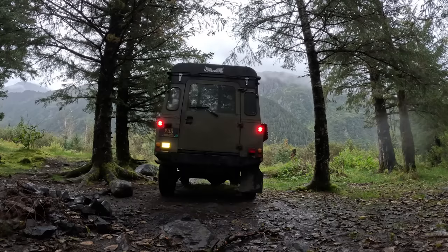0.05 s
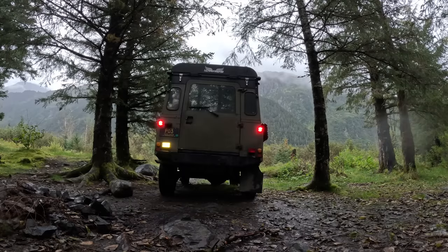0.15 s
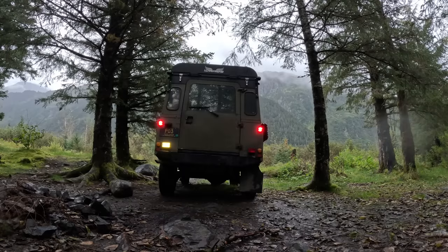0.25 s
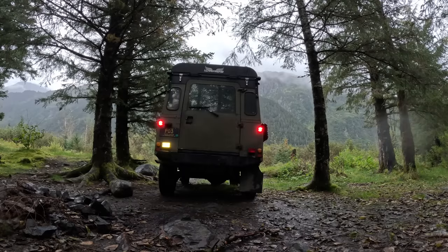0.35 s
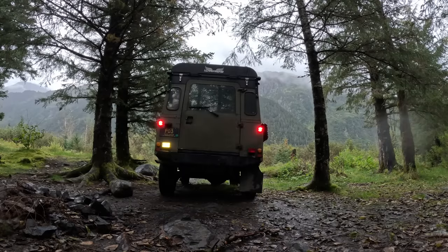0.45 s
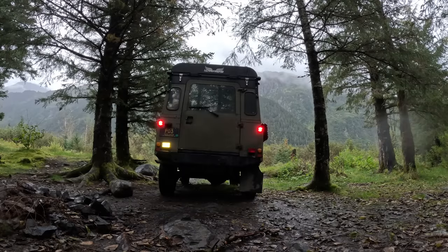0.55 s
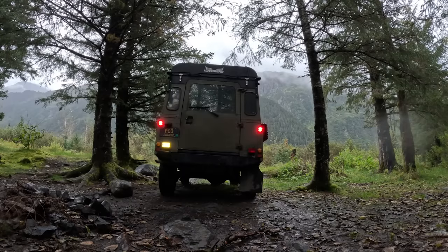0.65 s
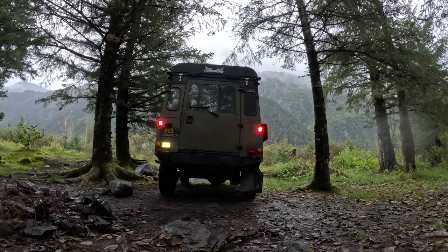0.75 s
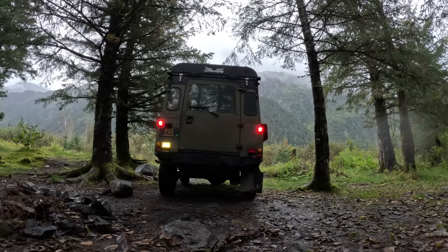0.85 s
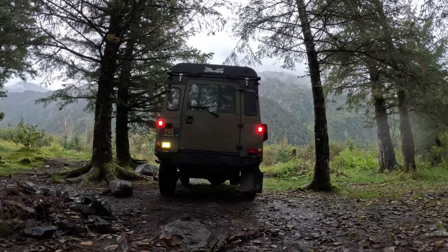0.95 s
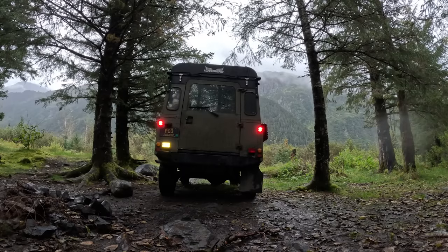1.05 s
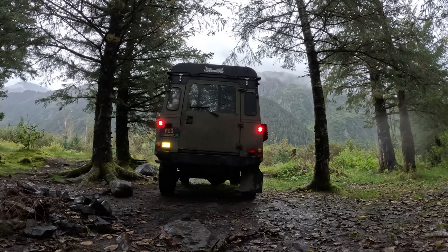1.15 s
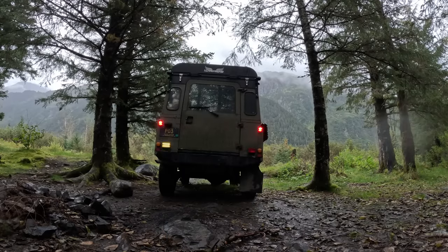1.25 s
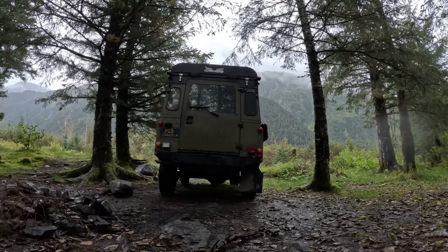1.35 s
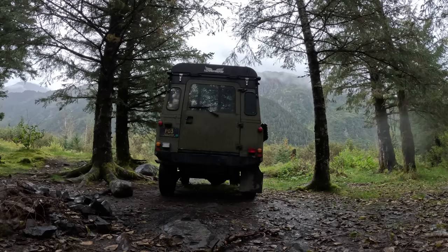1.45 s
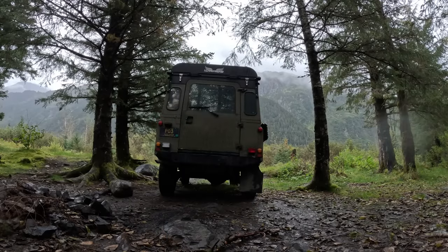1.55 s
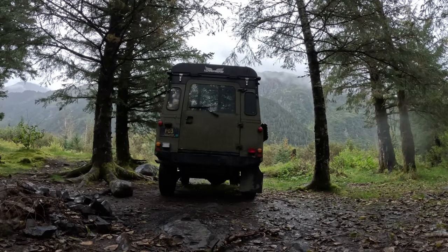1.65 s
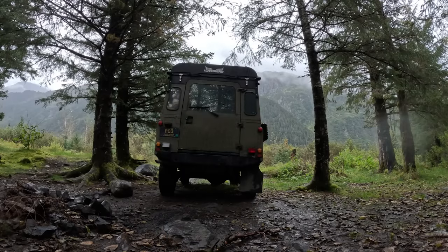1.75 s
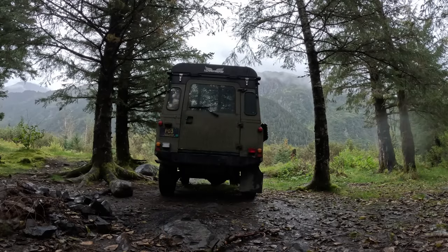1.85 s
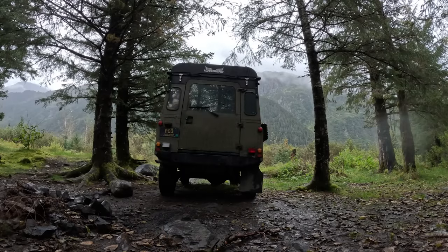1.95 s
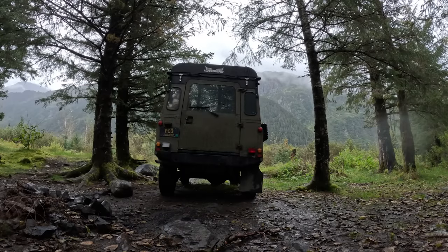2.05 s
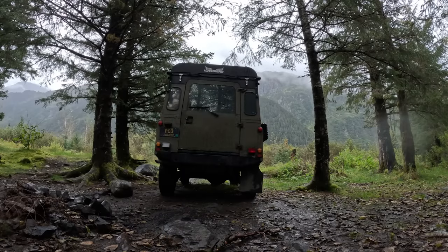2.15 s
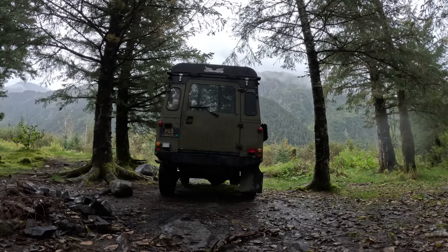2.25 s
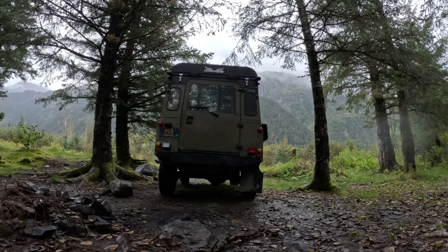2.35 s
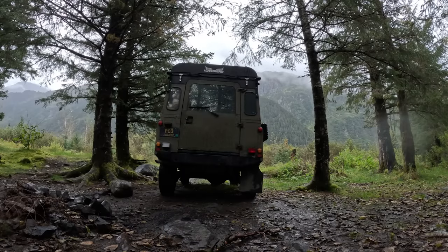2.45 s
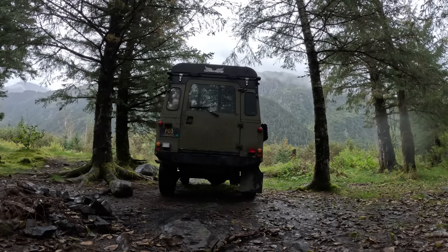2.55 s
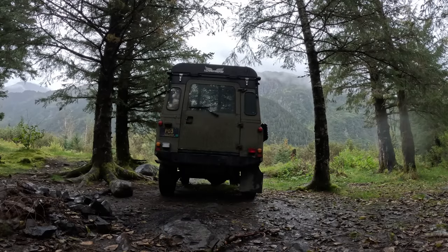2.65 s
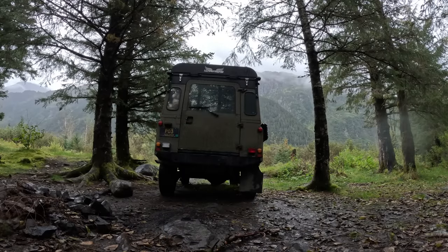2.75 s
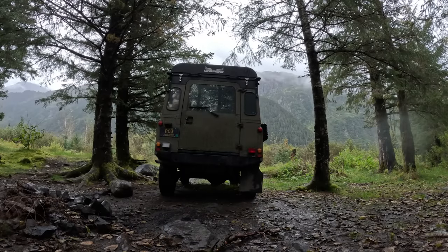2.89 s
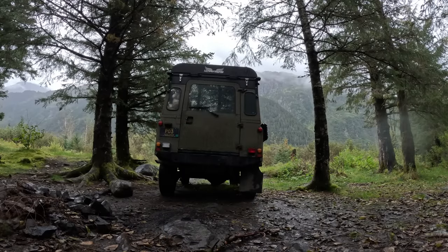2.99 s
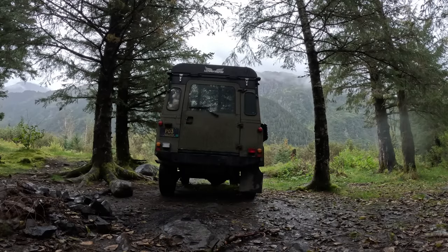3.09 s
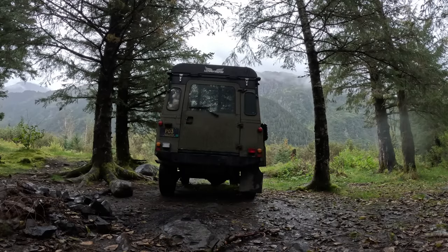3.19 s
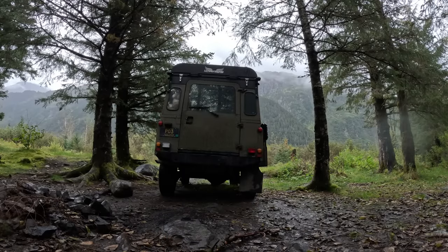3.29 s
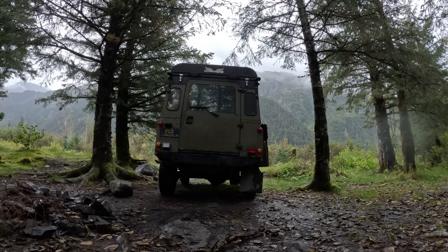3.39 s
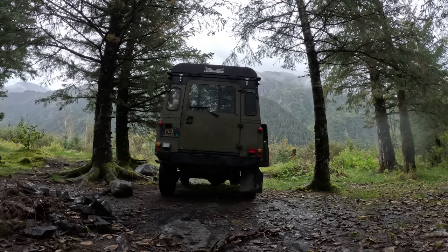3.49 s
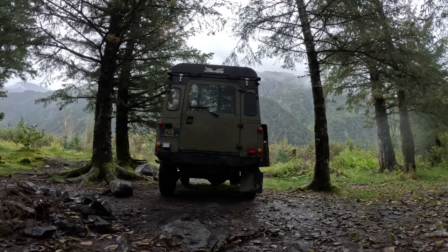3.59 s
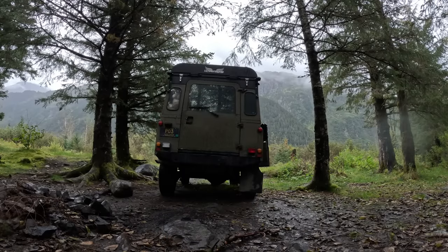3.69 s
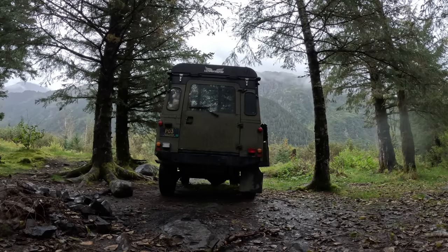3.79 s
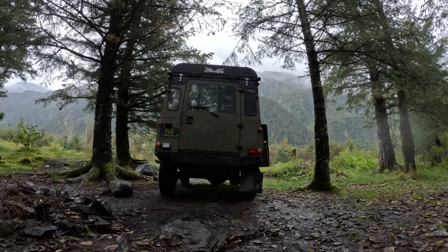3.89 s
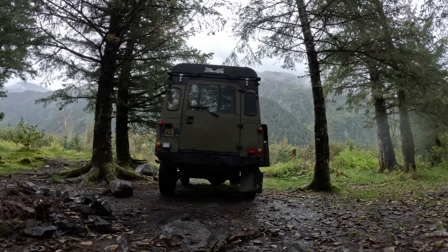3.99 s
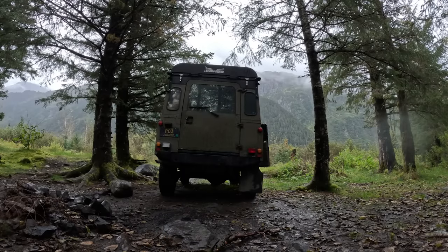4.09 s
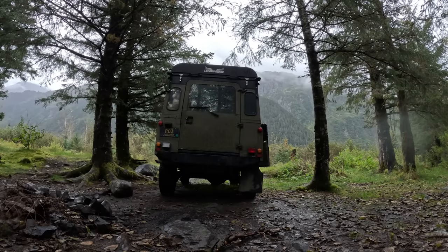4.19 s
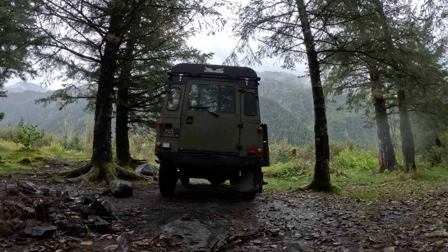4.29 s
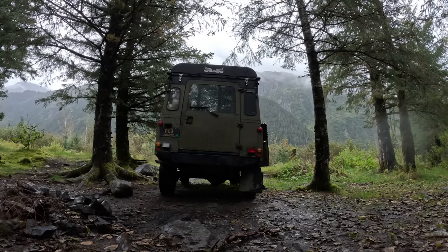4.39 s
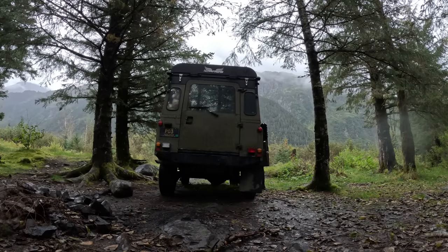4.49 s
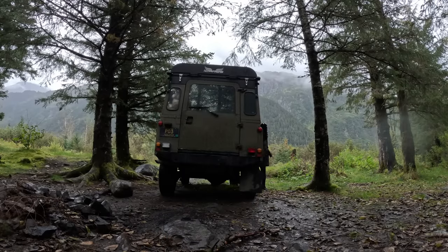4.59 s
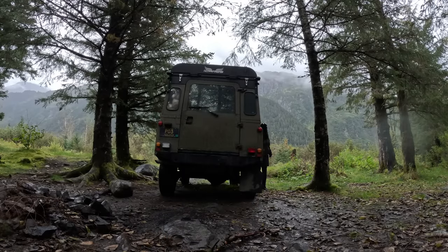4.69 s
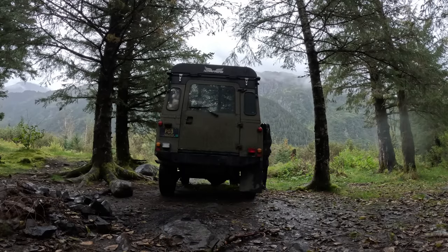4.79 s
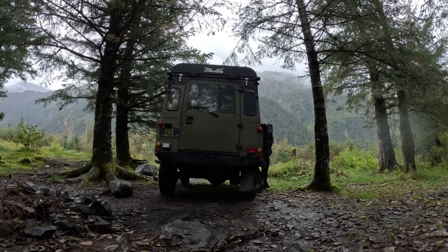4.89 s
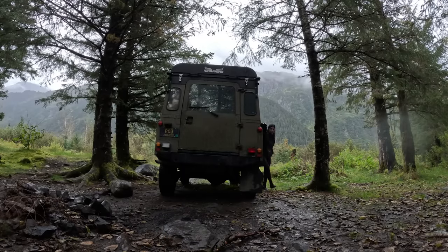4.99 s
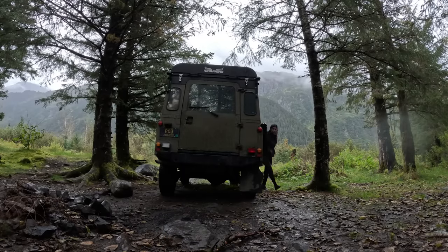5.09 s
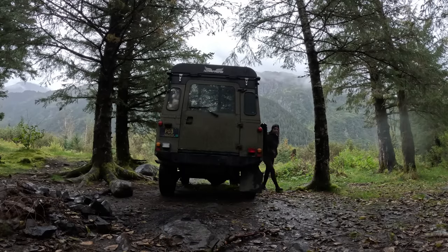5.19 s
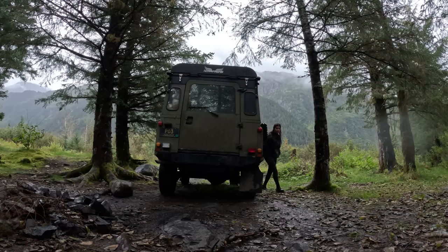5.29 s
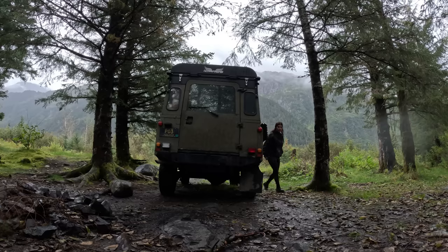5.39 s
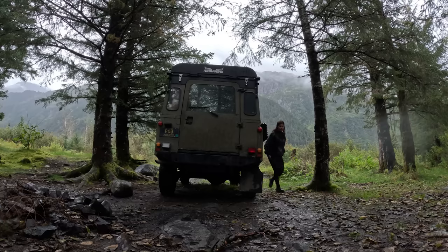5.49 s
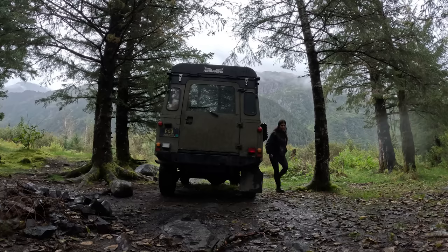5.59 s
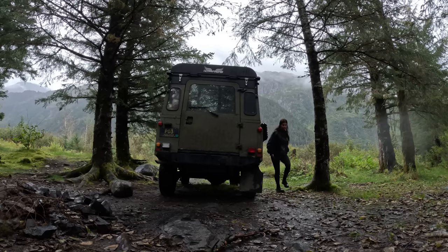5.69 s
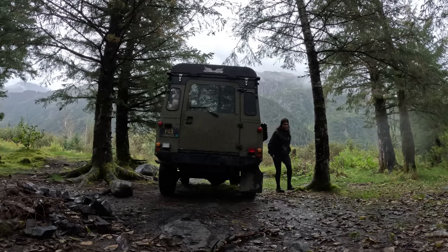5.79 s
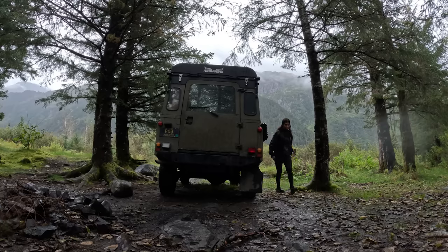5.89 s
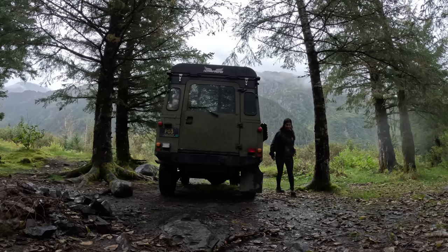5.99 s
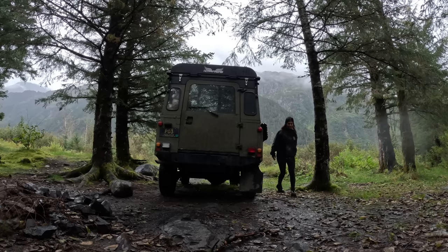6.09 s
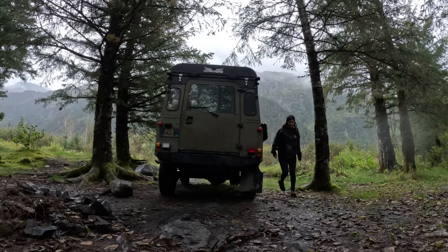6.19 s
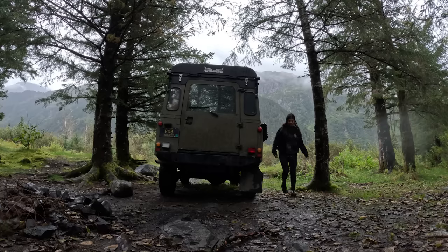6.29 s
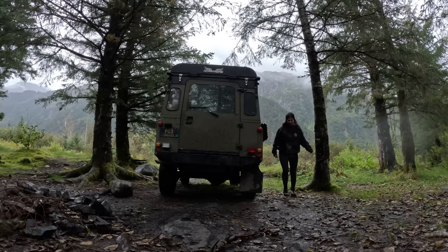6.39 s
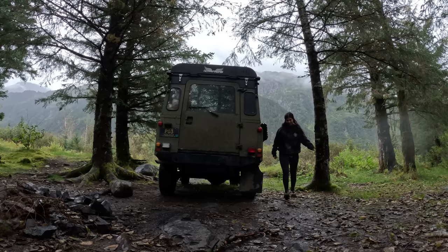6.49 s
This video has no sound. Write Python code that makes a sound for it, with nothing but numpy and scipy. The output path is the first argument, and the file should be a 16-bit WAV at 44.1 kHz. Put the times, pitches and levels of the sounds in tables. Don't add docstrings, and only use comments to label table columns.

```python
import sys
import numpy as np
from scipy import signal
from scipy.fft import rfft, irfft, next_fast_len
from scipy.io import wavfile

SR = 44100
rng = np.random.default_rng(int(sys.argv[2]) if len(sys.argv) > 2 else 0)


def level_to_linear(level):
    exponent = np.asarray(level, float) / 20
    return 10 ** exponent


def output_pcm(signal):
    pcm = np.clip(np.atleast_2d(signal).T, -1, 1) * 32767
    wavfile.write(sys.argv[1], SR, np.round(pcm).astype(np.int16))


N = 288742
TINY = 1e-18


def at_hz(points, hz):
    table_hz, value = np.array(points)[:, :2].T
    return np.interp(np.log(hz), np.log(table_hz), value)


def clicks(times_s, db):
    out = np.full(N, TINY)
    at = np.round(np.asarray(times_s) * SR).astype(int)
    np.add.at(out, at, level_to_linear(db))
    return out


def ring(x, hz, t60_s):
    radius = level_to_linear(-60 / (t60_s * SR))
    angle = 2 * np.pi * hz / SR
    return signal.lfilter([0, np.sin(angle)], [1, -2 * radius * np.cos(angle), radius ** 2], x)


def ring_modes(x, modes):
    return sum(level_to_linear(db) * ring(x, hz, t60_s) for hz, db, t60_s in modes)


def butter(x, order, hz, kind):
    return signal.sosfilt(signal.butter(order, hz, kind, fs=SR, output="sos"), x)


def lowpass(x, hz):
    return butter(x, 2, hz, "low")


def pan(x, left_right_db):
    return x * level_to_linear([[left_right_db / 2], [-left_right_db / 2]])


def swell(length, rise_s, t60_s):
    t = np.arange(length) / SR
    return (1 - np.exp(-t / rise_s)) * level_to_linear(-60 * t / t60_s)


def humps(rows):
    s, db, fall_db_per_s = np.transpose(rows)[:, :, None]
    return np.max(db - fall_db_per_s * np.abs(np.arange(N) / SR - s), axis=0)


# time in seconds, level in dB.
SHOWER = [
    (2.5, -56),
    (2.58, -56.5),
    (5.24, -53.5),
    (5.58, -55.5),
    (5.74, -58),
    (5.99, -57.5),
    (6.22, -55.5),
    (6.55, -56.5),
]


def shower():
    s, db = np.transpose(SHOWER)
    return level_to_linear(np.interp(np.arange(N) / SR, s, db - db.mean()))


# frequency in Hz, likeness 0 to 1.
RAIN_ALIKE = [(60, 0.95), (150, 1), (380, 0.78), (950, 0.68), (2380, 0.54), (5980, 0.69), (15000, 0.3)]
# frequency in Hz, level in dB per Hz.
RAIN = [(30, -7), (95, -7.5), (181, -1), (373, -8), (458, -14.5), (592, -13), (871, -21.5), (1020, -13),
        (1310, -11.5), (6310, -21), (9200, -28), (10300, -42), (12000, -39.5), (13600, -48)]
RAIN_DB, RAIN_DROPS_PER_S = -52.5, 1500


def rain():
    size = next_fast_len(N)
    hz = np.maximum(np.fft.rfftfreq(size, 1 / SR), 1)
    drop_level = level_to_linear(5.0 * np.minimum(rng.exponential(1, (2, N)), 4))
    drops = (rng.random((2, N)) < RAIN_DROPS_PER_S / SR) * drop_level
    drops = drops * rng.choice([-1, 1], (2, N))
    source = rng.standard_normal((2, N)) + 0.68 * drops / drops.std()
    alike = np.clip(at_hz(RAIN_ALIKE, hz), 0, 1)
    colour = level_to_linear(at_hz([(15, -42)] + RAIN + [(14300, -75)], hz))
    mid, side = rfft(source, size) * colour * np.sqrt([1 + alike, 1 - alike])
    pair = irfft(np.array([mid + side, mid - side]), size)[:, :N]
    pair = pan(pair, -.6)
    return level_to_linear(RAIN_DB) * pair / pair.std()


PATTER_DB, PATTER_DROPS_PER_S, PITCHES = -68.0, 300, 14


def patter():
    level = level_to_linear(5.0 * np.minimum(rng.exponential(1, N), 4))
    drops = (rng.random(N) < PATTER_DROPS_PER_S / SR) * level
    pitch = rng.integers(0, PITCHES, N)
    out = 0
    for k, hz in enumerate(np.geomspace(1300, 9000, PITCHES)):
        struck = ring(drops * (pitch == k) + TINY, hz, 16.6 / hz)
        out = out + pan(struck, 2 * rng.normal(0, 1.6))
    return level_to_linear(PATTER_DB) * out


# time in seconds, peak in dB, frequency in Hz, left-right in dB.
DRIPS = [(1.5602, -33.5, 2830, 11), (1.335, -37, 2800, 11), (2.1148, -34, 2340, 6),
         (2.2227, -30, 2720, -.6), (2.319, -29, 2700, 3), (2.607, -33, 3070, 8), (2.6424, -41, 3500, 13),
         (2.7784, -31.5, 2300, 4), (2.803, -38, 2770, 4), (3.0508, -34, 2660, 6), (3.121, -36, 2900, 9),
         (3.321, -34, 2850, 5), (3.3845, -35, 3560, 6), (3.6609, -38, 3360, 5), (3.704, -36, 3900, 6),
         (3.7826, -35, 3750, 5), (3.9867, -34, 2410, 6), (4.115, -32, 2640, 5), (4.2935, -34, 2880, 4),
         (4.3683, -35, 3580, 4), (4.583, -34, 2670, -1.1), (4.6532, -29, 5160, 6), (4.938, -28, 2600, 7),
         (5.2847, -31.5, 5410, 3), (5.3417, -33, 2320, .1), (5.953, -40, 3140, 8), (6.067, -30.5, 6800, 13),
         (6.1748, -35.5, 2830, 9), (6.1983, -33, 6040, -.6), (6.4012, -32, 3000, -1.5)]
# time in seconds, peak in dB.
TICKS = [(4.6519, -42), (6.0672, -38), (2.607, -30), (2.8016, -35.5), (3.3843, -43), (3.6607, -36),
         (3.8438, -34), (4.4596, -29), (4.9368, -49), (2.6461, -42), (2.7698, -44), (3.2772, -43),
         (3.3201, -41), (3.583, -40), (3.8254, -44), (3.9975, -41), (4.2929, -44), (4.5263, -40),
         (4.879, -42), (4.852, -44)]
TICK_HZ, TICK_PAN_DB = 7700, 5
# time in seconds, peak in dB, frequency in Hz, left-right in dB.
SNAPS = [
    (3.4912, -31, 8800, 3),
    (3.491, -41, 6040, -1.1),
    (4.998, -21, 4110, -1.5),
    (4.9982, -26, 8440, .1),
    (5.584, -26, 8540, -5),
    (5.736, -38, 2000, -1.1),
    (5.765, -42, 8500, 2.5),
    (5.184, -34, 11000, 3),
]


def drips_and_snaps():
    out, t = np.zeros((2, N)), np.arange(SR // 50) / SR
    rows = DRIPS + SNAPS + [(s, db, TICK_HZ, TICK_PAN_DB) for s, db in TICKS]
    for s, db, hz, pan_db in rows:
        grit = lowpass(rng.standard_normal(len(t)), min(2.5 * hz, 14000))
        tick = np.sin(2 * np.pi * hz * t) + 0.8 * grit
        tick = tick * level_to_linear(db - 2.5 - 60 * t * hz / 9.7)
        at = round(s * SR)
        out[:, at:at + len(t)] += pan(tick, pan_db)[:, :N - at]
    return out


# frequency in Hz, level in dB, t60 in seconds.
KEY_MODES = [(6560, 5, 0.089), (7900, 1.5, 0.067), (9200, -12, 0.068), (11830, -9, 0.075),
             (12250, -16, 0.084)]
# time in seconds, large keys in dB, small keys in dB.
KEYS = [(4.66, -70, -56), (4.714, -66, -62), (4.734, -56, -62), (4.75, -70, -68), (5.19, -72, -65),
        (5.22, -74, -57), (5.714, -59.5, -52), (6.09, -52.5, -53), (6.29, -64, -68), (6.32, -66, -67),
        (6.372, -70, -64), (6.465, -67, -61), (6.49, -80, -70)]


def keys():
    s, large_db, small_db = np.transpose(KEYS)
    out = 0
    for hz, db, t60_s in KEY_MODES:
        size_db = large_db if hz < 10000 else small_db
        strike_db = size_db + db + rng.normal(0, 2.0, len(s))
        soft_onset = ring(clicks(s, strike_db), hz, .01)
        out = out + ring(soft_onset, hz, t60_s) / 30
    return out


# time in seconds, level in dB.
BUCKLE = [
    (3.491, -50),
    (3.503, -41.5),
    (3.535, -55),
    (3.575, -53),
    (3.61, -58),
]
BUCKLE_HZ, BUCKLE_T60_S = 6040, 0.067


def buckle():
    soft_onset = ring(clicks(*np.transpose(BUCKLE)), BUCKLE_HZ, 0.011)
    return ring(soft_onset, BUCKLE_HZ, BUCKLE_T60_S) / 30


# time in seconds, frequency in Hz, level in dB.
SQUEAK = [
    (4.385, 1390, -63),
    (4.449, 1412, -54),
    (4.463, 1326, -44.5),
    (4.533, 1293, -59),
    (4.555, 1180, -59),
]


def hinge():
    s, hz, db = np.transpose(SQUEAK)
    t = np.arange(N) / SR
    glide_hz = np.interp(t, s, hz, left=-140, right=-140)
    level_db = np.interp(t, s, db, left=-140, right=-140)
    waver = 1 + 3.5 * lowpass(rng.standard_normal(N), 80)
    return np.sqrt(2) * level_to_linear(level_db) * waver * np.sin(2 * np.pi * np.cumsum(glide_hz) / SR)


def with_low(bursts, low_db):
    return [(s, db, low_db, mid_db, high_db, t60_s) for s, db, mid_db, high_db, t60_s in bursts]


def with_treble(bursts):
    return [(s, db, low_db, mid_db, max(mid_db - 8, -40), t60_s) for s, db, low_db, mid_db, t60_s in bursts]


def add(envelope, bursts, hz, rise_s, fade_tilt):
    for s, db, low_db, mid_db, high_db, t60_s in bursts:
        colour = [(55, low_db), (220, -15.0), (1000, mid_db - 11.5), (5000, high_db - 4.5),
                  (10500, high_db - 9), (14500, high_db - 8)]
        fade_s = t60_s * (hz / 500) ** -fade_tilt
        shape = swell(int(SR * min(fade_s, .5)), rise_s + 0.47 / hz, fade_s)
        at = round(s * SR)
        envelope[at:at + len(shape)] += level_to_linear(db + at_hz(colour, hz)) * shape[:N - at]


# start in seconds, peak in dB near 220 Hz, dB re that near 1000 and 5000 Hz,
# t60 in seconds.
DOOR_STOP = [
    (4.997, -18, 2.5, -6.5, 0.17),
    (5.017, -28.5, -11, -16.5, 0.39),
    (5.059, -34.5, -24, -18, 0.33),
    (4.99, -50, 5, -5, .05),
    (5.07, -58, 6, 1.5, .5),
]
STOP_LOW_DB = -24.5
# frequency in Hz, level in dB, t60 in seconds.
DOOR_SKIN = [(668, -5, .15), (1174, -2, .12), (2390, -8, .2), (2557, -7, .18), (2724, -7, .2),
             (3650, -14, .3), (3817, -8, .2), (4296, -12, .3), (4710, -11, .25), (5626, -17, .2),
             (6525, -18, .25), (7418, -17, .2)]
DOOR_SKIN_DB = -12


def door_skin():
    shake = np.full(N, TINY)
    add(shake, with_low(DOOR_STOP, STOP_LOW_DB), 220, rise_s=.0005, fade_tilt=0)
    contacts = shake * (rng.random(N) < 900 / SR) * rng.standard_normal(N)
    return level_to_linear(DOOR_SKIN_DB) * ring_modes(contacts, DOOR_SKIN)


# start in seconds, level in dB, frequency in Hz,
# t60 in seconds.
ENGINE_RINGS = [(1.68, -45, 398, .23), (1.836, -45, 1220, .08), (2.149, -19, 140, 0.15),
                (2.1633, -17, 140, 0.09), (2.137, -30, 420, .08), (2.153, -29, 570, .08),
                (2.18, -31, 570, .08), (2.235, -28, 950, .07), (2.256, -30, 330, .08),
                (2.33, -29, 950, .06), (2.416, -33, 900, .06), (2.432, -34, 570, .06),
                (2.236, -16, 165, 0.06), (2.256, -16, 140, 0.13), (2.331, -14.5, 140, 0.1)]
CAB_RINGS = [(2.811, -36, 380, 0.069), (2.829, -34, 252, 0.052), (2.949, -8.5, 185, 0.055),
             (2.973, -17, 190, 0.11), (3.04, -32, 190, .15), (3.075, -38, 160, .12), (3.105, -36, 170, .12),
             (3.15, -37, 165, .15), (3.005, -32, 125, .12), (2.811, -32, 95, .12), (3.245, -29, 72, .12),
             (3.3, -34, 72, .2), (3.37, -33, 75, .1), (3.229, -21, 322, 0.09), (3.343, -21.5, 275, .045),
             (3.365, -36, 200, 0.08), (3.83, -38, 190, .15), (3.882, -30, 180, 0.11), (4.335, -35, 52, .12),
             (4.92, -41, 240, .15), (4.114, -38.5, 215, 0.19), (4.69, -44.5, 370, .32),
             (4.69, -50, 564, 0.15), (4.715, -44, 330, .15), (4.801, -41, 338, .3)]
STOP_RINGS = [
    (4.997, -22, 928, 0.07),
    (4.998, -19.5, 3980, 0.03),
    (4.998, -32, 1400, .05),
    (4.999, -18, 251.5, 0.17),
    (5.02, -22.5, 1204, 0.056),
    (5.028, -23.5, 681, 0.082),
    (5.05, -26, 145, 0.1),
]
SLAM_RINGS = [(5.571, -8, 56.3, 0.18), (5.574, -16, 252, 0.14), (5.58, -27, 9000, 0.04),
              (5.606, -18, 75, .12), (5.585, -29, 420, .15), (5.64, -26, 105, .15), (5.855, -38, 135, .15),
              (5.596, -15, 315, 0.089), (5.596, -14, 137, 0.076), (5.593, -9.5, 37.3, 0.24),
              (5.64, -25, 45, 0.24), (5.64, -25.5, 305, .19), (5.691, -36, 120, 0.48), (5.7, -51, 578, .24),
              (5.72, -22, 49.7, 0.16), (5.818, -34.5, 31.1, 0.64)]
ENGINE_BUILD, CAB_BUILD, STOP_BUILD, SLAM_BUILD = 1.3, 1.0, 1.2, .15


def panels():
    out, t = np.zeros(N + SR), np.arange(SR) / SR
    strike = np.r_[1., np.full(SR - 1, TINY)]
    causes = [(ENGINE_RINGS, ENGINE_BUILD), (CAB_RINGS, CAB_BUILD),
              (STOP_RINGS, STOP_BUILD), (SLAM_RINGS, SLAM_BUILD)]
    for rings, build_cycles in causes:
        for s, db, hz, t60_s in rings:
            at = round(s * SR)
            contact = lowpass(strike, min(2 * hz, 15000))
            growth = 1 - np.exp(-t * hz / build_cycles)
            out[at:at + SR] += level_to_linear(db) * ring(contact, hz, t60_s) * growth
    return out[:N]


# start in seconds, peak in dB near 220 Hz, dB re that near 1000 and
# 5000 Hz, t60 in seconds.
SHUDDER = [
    (2.138, -20.5, -4.5, -26, 0.19),
    (2.155, -33, -9, -39, 0.066),
    (2.226, -18.5, -12.5, -20, 0.15),
    (2.254, -35, 2, -24, 0.18),
    (2.323, -18, -7, -19.5, 0.081),
    (2.331, -33, -11, -22, 0.28),
    (2.416, -27, -5, -22.5, .12),
]
SHUDDER_LOW_DB = -17
# frequency in Hz, level in dB, t60 in seconds.
MOUNTS = [(370, -5, 0.14), (567, 3.5, 0.049), (686, -4.5, 0.088), (949, 3, 0.03), (1110, -21, 0.064),
          (2165, -11, 0.056), (2750, -12, 0.059)]


def mounts():
    shake = np.full(N, TINY)
    add(shake, with_low(SHUDDER, SHUDDER_LOW_DB), 220, rise_s=0.0019, fade_tilt=0)
    contacts = shake * (rng.random(N) < 500 / SR) * rng.standard_normal(N)
    return ring_modes(contacts, MOUNTS)


# start in seconds, peak in dB
# near 220 Hz, dB re that near 55 and 1000 Hz, t60 in seconds.
BUMPS = [(1.938, -64.5, -10, 21, 0.23), (2.811, -40.5, 10.5, -2, 0.071), (2.827, -29, -38, -24.5, 0.43),
         (2.948, -20, -26, -22, 0.22), (3.229, -23.5, -22, -14, 0.18), (3.34, -30, -30, -23, 0.25),
         (3.379, -41, -20, -15, .12), (3.829, -33.5, -39, -49, 0.53), (3.878, -37.5, -14, -41, 0.24),
         (4.113, -33.5, -23, -40, 0.29), (4.197, -63.5, 9, 19, 0.14), (4.334, -39, -16, -9, 0.19),
         (4.679, -52, -35, -10, .25)]
# start in seconds, peak in dB near 220 Hz, dB re that near 1000 and 5000 Hz, t60 in seconds.
SLAM = [
    (5.557, -16, -12, -35, 0.36),
    (5.57, -21.5, -10, -11, .18),
    (5.578, -33, -4, 2.5, .1),
    (5.596, -20, -53, -25, 0.18),
    (5.64, -33.5, -35, -43, 1),
]
SLAM_LOW_DB = -11
# start in seconds, peak in dB near 220 Hz, dB re that near
# 1000 and 5000 Hz, t60 in seconds.
GASPS = [
    (1.525, -69, 5, 14, .1),
    (1.568, -67, 5, 14, .1),
    (1.614, -66, 0, 17, .12),
    (1.835, -66, 0, 15, .15),
    (1.904, -69, 0, 14, .08),
]
# time in seconds, peak in dB, fall either side in dB per second.
SWAYS = [
    (2.0, -43, 43),
    (2.61, -33, 95),
    (3.97, -34.5, 88),
    (4.28, -39, 70),
    (5.67, -26, 159),
    (6.3, -42, 70),
]
# time in seconds, peak in dB, fall either side in dB per second.
SHIFTS = [
    (2.19, -27.5, 75),
    (2.33, -30, 65),
    (3.6, -39.5, 29),
    (4.06, -43.5, 70),
    (4.75, -38.5, 25),
    (5.49, -33.5, 111),
    (5.67, -54, 160),
    (5.9, -49.5, 40),
]
# frequency in Hz, level in dB per Hz.
CLATTER = [(160, 2), (280, -2), (376, -4), (415, -13), (566, -4), (700, -14), (956, -5.5), (1070, -7),
           (1560, -8.5), (2030, -15.5), (2720, -18), (9000, -28), (14000, -43)]
# frequency in Hz, likeness 0 to 1.
TRUCK_ALIKE = [(100, .999), (500, 0.98), (1500, 0.84), (3000, 0.75), (8000, 1), (12000, 0.31)]
# frequency in Hz, left-right in dB.
TRUCK_PAN = [(60, 0.6), (700, -1), (4000, -1), (10000, 2.5)]


def body_noise(clatter):
    rumble, rustle = level_to_linear(humps(SWAYS)), level_to_linear(humps(SHIFTS))
    edges_hz = 25 * 2 ** (np.arange(29) / 3)
    white, out = rng.standard_normal((2, 2, N)), 0
    white *= level_to_linear(2.37 * np.minimum(rng.exponential(1, N), 5))
    for k, (low, high) in enumerate(zip(edges_hz, edges_hz[1:])):
        hz = np.sqrt(low * high)
        mid, side = butter(white[k % 2], 2, [low, high], "band")
        envelope = clatter * level_to_linear(at_hz([(150, -32)] + CLATTER, hz)) * np.sqrt(hz / 300)
        envelope += rumble * level_to_linear(at_hz([(30, -22.5), (70, -43), (130, -40)], hz))
        envelope += rustle * level_to_linear(at_hz([(70, -43), (130, -20), (300, -22.5), (550, -23), (900, -35)], hz))
        add(envelope, with_low(SHUDDER + GASPS, SHUDDER_LOW_DB), hz, rise_s=0.0097, fade_tilt=0.031)
        add(envelope, with_treble(BUMPS), hz, rise_s=0.00028, fade_tilt=0.29)
        add(envelope, with_low(DOOR_STOP, STOP_LOW_DB), hz, rise_s=0.0006, fade_tilt=0.07)
        add(envelope, with_low(SLAM, SLAM_LOW_DB), hz, rise_s=0.0068, fade_tilt=0.055)
        alike = np.clip(at_hz(TRUCK_ALIKE, hz), 0, 1)
        pair = np.sqrt(1 + alike) * mid + np.sqrt(1 - alike) * side * [[1], [-1]]
        out = out + pan(envelope * pair / (np.sqrt(2) * mid.std()), at_hz(TRUCK_PAN, hz))
    return out


FIRST_FIRING_S, FIRING_GAP_S, FIRINGS = .1775, .0407968, 33


def firings():
    k = np.arange(FIRINGS)
    return FIRST_FIRING_S + k * FIRING_GAP_S + rng.normal(0, 0.00037, FIRINGS), k % 4


CUT_S, SLOWING_PER_S2, PUFFS = 1.485, 25.18, 11


def rundown():
    idle_hz = 1 / FIRING_GAP_S
    speed_hz = np.sqrt(idle_hz ** 2 - 2 * SLOWING_PER_S2 * np.arange(PUFFS))
    return CUT_S + (idle_hz - speed_hz) / SLOWING_PER_S2, 20 * np.log10(speed_hz / idle_hz)


# cylinder, delay in seconds, frequency in Hz, level in dB, t60 in seconds.
LOOSE = [(0, 0.00027, 965, -33, 0.04), (0, 0.015, 964, -40, 0.09), (0, 0.0005, 1556, -32, 0.025),
         (0, .004, 1400, -36, .03), (1, 0.0087, 373.3, -43.5, 0.2), (3, 0.0024, 560, -53, 0.024),
         (0, 0.006, 2750, -45, .022), (0, .004, 2250, -44, .02), (1, .002, 2750, -43, 0.022),
         (1, .003, 970, -39, 0.034), (2, .003, 990, -39, 0.019)]
LOOSE_BUILD_S = .018


def loose_parts(times, cylinder):
    out = 0
    for which, delay_s, hz, db, t60_s in LOOSE:
        at_s = times[cylinder == round(which)] + delay_s
        knocks = clicks(at_s, db + rng.normal(0, 1.2, len(at_s)))
        passed_on = ring(knocks, hz, LOOSE_BUILD_S)
        out = out + ring(passed_on, hz, t60_s) / (SR * LOOSE_BUILD_S / 22)
    return out


# exhaust in dB, clatter in dB.
CYLINDER_DB = [(0.5, -1.1), (-3, -2.5), (4, -1.5), (-4, -1)]
VALVE_PATTERN_DB = [-2, -0.7, 2.5, 1.5]
CLATTER_DB = -37.5
VALVE_DB, VALVE_FOLLOWS = -48.5, 1


def clatter_envelope(times, cylinder):
    level_db = CLATTER_DB + np.array(CYLINDER_DB)[cylinder, 1] + rng.normal(0, .8, len(times))
    knock = signal.oaconvolve(clicks(times - .002, level_db), swell(SR // 4, rise_s=.008, t60_s=.14))
    s, speed_db = rundown()
    valve_db = VALVE_DB + VALVE_FOLLOWS * speed_db + np.resize(VALVE_PATTERN_DB, PUFFS)
    valves = signal.oaconvolve(clicks(s, valve_db), swell(SR // 4, rise_s=0.0056, t60_s=0.2))
    return (knock + valves)[:N]


# frequency in Hz, width in Hz, level in dB.
BLOCK = [(990, 71, -3), (1400, 77, 0.5), (1654, 180, 0.5), (2720, 310, -5.5), (4310, 370, -7.5)]


def block(clatter):
    knock = clatter * rng.standard_normal(N)
    return sum(ring(knock, hz, 4.3 / width_hz) * np.sqrt(width_hz / SR) * level_to_linear(db + 2.3)
               for hz, width_hz, db in BLOCK)


# frequency in Hz, level in dB, t60 in seconds.
HOT_PIPE = [(47.9, -31, .36), (72.7, -38, .4), (95.9, -41, .4), (152.8, -32, .23), (209.3, -28.5, .4)]
# frequency in Hz, level in dB, t60 in seconds.
PIPE = [(44.8, 2, 0.17), (68.5, -3, 0.16), (87, -4.5, 0.17), (120.4, -6, 0.26), (154.5, -14, 0.15),
        (215, -10.5, 0.087), (252, -9.5, 0.3)]
PUFF_DB, PUFF_FOLLOWS = -27, 0.96


def exhaust(times, cylinder):
    earlier = FIRST_FIRING_S - FIRING_GAP_S * np.arange(4, 0, -1)
    every = np.r_[earlier, times]
    pattern_db = np.r_[np.zeros(4), np.array(CYLINDER_DB)[cylinder, 0]]
    fired = 0
    for hz, db, t60_s in HOT_PIPE:
        uneven_db = db + pattern_db + hz / 120 * rng.standard_normal(len(every))
        pulses = clicks(every + .0042, uneven_db) - clicks(every, uneven_db)
        fired = fired + ring(lowpass(pulses, 100), hz, t60_s)
    after_s = np.maximum(np.arange(N) / SR - times[-1] - .02, 0)
    fired = fired * level_to_linear(-400.0 * after_s)
    s, speed_db = (v[1:] for v in rundown())
    puff_db = PUFF_DB + PUFF_FOLLOWS * speed_db
    puffs = lowpass(clicks(s, puff_db) - clicks(s - .008, puff_db - 5.5), 200)
    return fired + ring_modes(puffs, PIPE)


def trees(x):
    out, dull = np.zeros((2, N)), lowpass(x, 5000)
    lags = (rng.uniform(0.00355, 0.095, 12) * SR).astype(int)
    for k, lag in enumerate(lags):
        out[k % 2, lag:] += dull[:-lag] * level_to_linear(-200.0 * lag / SR) * (-1) ** (k // 2)
    return butter(out, 2, 300, "high")


MIC_CUT_HZ, MIC_LEAK_DB = 9220, -24.5


def microphone(x):
    muffled = butter(x, 6, MIC_CUT_HZ, "low")
    return muffled + level_to_linear(MIC_LEAK_DB) * (x - muffled)


def scene():
    times, cylinder = firings()
    knock_times, knock_cylinder = times[:-1], cylinder[:-1]
    clatter = clatter_envelope(knock_times, knock_cylinder)
    struck = loose_parts(knock_times, knock_cylinder) + block(clatter) + panels() + mounts() + door_skin()
    truck = pan(exhaust(times, cylinder), -.2) + pan(struck, -.7) + level_to_linear(-25) * trees(struck)
    rain_gain = shower()
    near = truck + body_noise(clatter) + drips_and_snaps() + rain_gain * patter()
    small_metal = keys() + buckle() + hinge()
    return microphone(near) + pan(small_metal, 1.0) + rain_gain * rain()


def low_pass(x):
    return signal.sosfilt(signal.butter(12, 16200, fs=SR, output="sos"), x)


START_S, TOP_HZ, BOTTOM_HZ = .1755, 16100, 4


def record(dry):
    cut = signal.sosfilt(signal.cheby2(10, 60, TOP_HZ, fs=SR, output="sos"), dry)
    cut = signal.lfilter([1, -1], [1, -np.exp(-2 * np.pi * BOTTOM_HZ / SR)], cut)
    return low_pass(cut * (np.arange(N) >= START_S * SR))


dry = scene()
out = record(dry)
output_pcm(out)
```